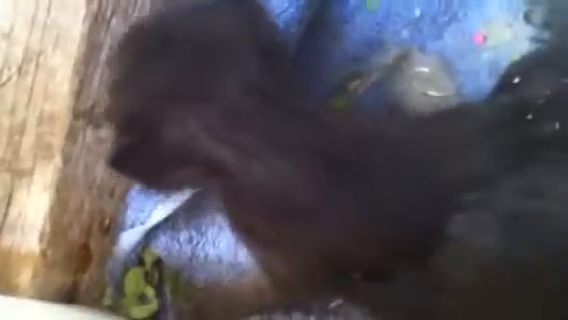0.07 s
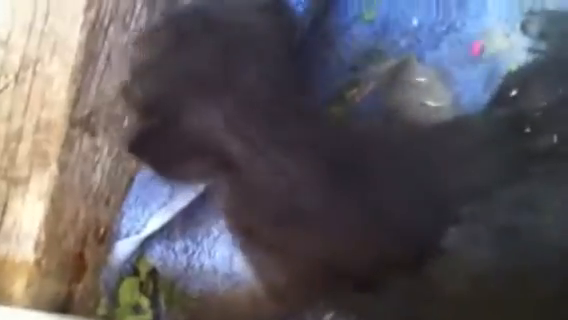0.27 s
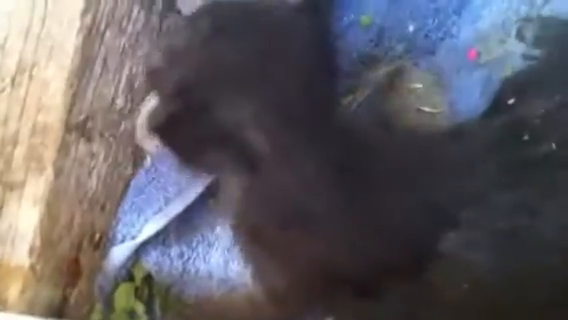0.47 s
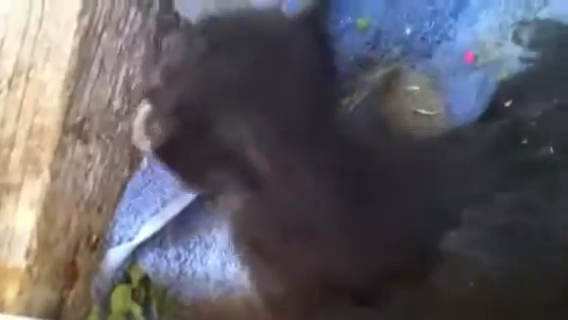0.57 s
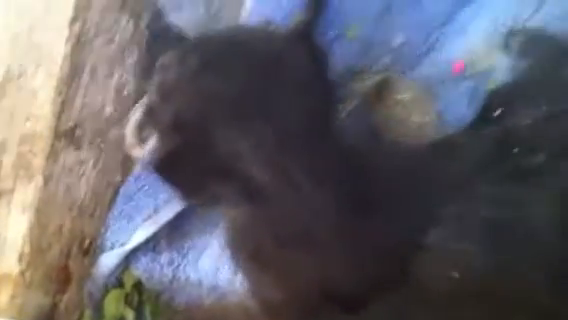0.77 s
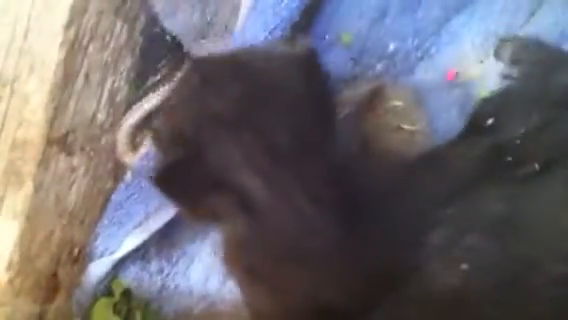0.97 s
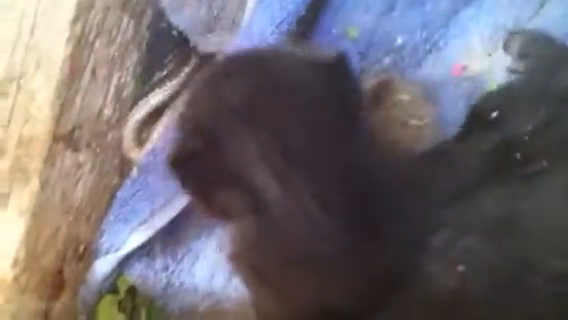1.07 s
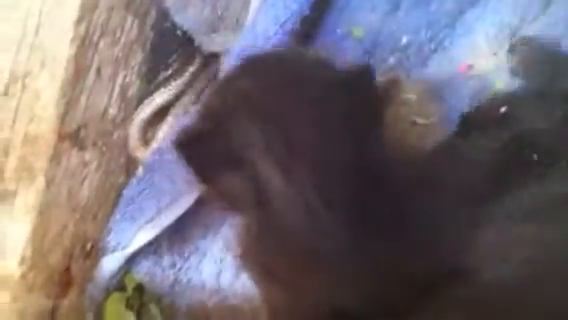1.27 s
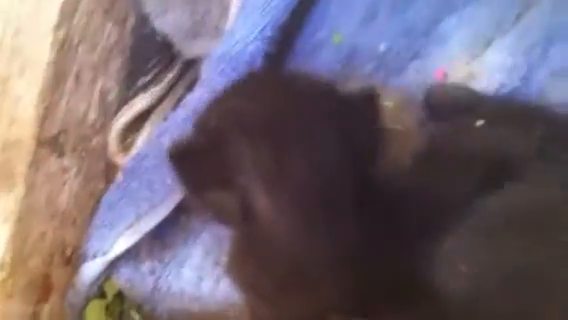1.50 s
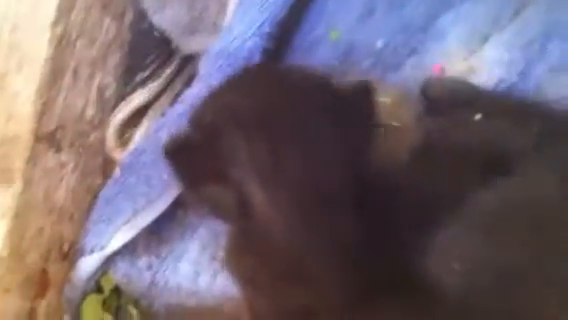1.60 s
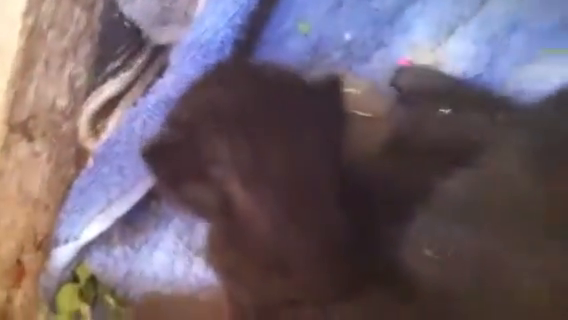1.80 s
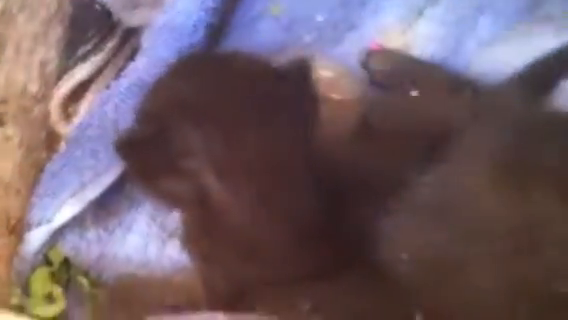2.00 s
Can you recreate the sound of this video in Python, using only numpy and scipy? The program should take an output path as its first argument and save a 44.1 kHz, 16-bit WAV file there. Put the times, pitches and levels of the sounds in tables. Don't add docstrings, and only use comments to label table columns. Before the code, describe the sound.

Two high, cracking kitten mews up close, over low air thumps, fur rustle and tiny ticks

```python
import sys
import numpy as np
from scipy import signal
from scipy.io import wavfile

SR = 44100
rng = np.random.default_rng(int(sys.argv[2]) if len(sys.argv) > 2 else 0)


def invert_db(level):
    return 10 ** (np.asarray(level, dtype=float) / 20)


def unload_audio(sound):
    columns = np.transpose(np.atleast_2d(sound))
    steps = np.round(np.clip(columns, -1, 1) * 32767)
    wavfile.write(sys.argv[1], SR, steps.astype(np.int16))


N = 90404
T = np.arange(N) / SR


def rms_one(x):
    return x / np.sqrt(np.mean(x ** 2) + 1e-20)


def drift(rate_hz):
    r = np.exp(-2 * np.pi * rate_hz / SR)
    settle = 20000
    wander = signal.lfilter([1], [1, -2 * r, r * r], rng.standard_normal(N + settle))
    return rms_one(wander[settle:])


def gate(start, length, edge):
    inside = np.minimum(T - start, start + length - T)
    return np.sin(np.pi / 2 * np.clip(inside / edge + .5, 0, 1)) ** 2


def band(x, low_hz, high_hz):
    return signal.sosfilt(signal.butter(2, [low_hz, high_hz], "band", fs=SR, output="sos"), x)


def coloured(spectrum):
    hz, db = np.transpose(spectrum)
    edges = 295 * 2 ** np.arange(0, 6, 1 / 3)
    white = rng.standard_normal((2, N))
    out = 0
    for k, (low, high) in enumerate(zip(edges, edges[1:])):
        level = np.interp(np.log(low * high) / 2, np.log(hz), db)
        out = out + invert_db(level + drift(20)) * band(white[k % 2], low, high)
    return rms_one(out)


# f/Hz, level/dB per Hz
AIR_SPECTRUM = [(320, -2), (1000, -1), (4300, -12), (5200, -23.5), (9000, -27), (12000, -26.5),
                (15600, -44)]


def still_air():
    return invert_db(-60) * coloured(AIR_SPECTRUM)


# t/s, level/dB
RUB_LEVEL = [(0, -55.5), (.17, -52.5), (0.201, -59.5), (.57, -64), (.6, -58.5), (.67, -63), (.71, -56),
             (0.796, -57.5), (0.829, -61.5), (1.3, -64.5), (1.35, -56), (1.47, -59), (1.563, -53),
             (1.621, -64), (1.691, -57), (1.838, -57), (1.87, -63.5), (2.05, -58)]
# f/Hz, level/dB per Hz
CLOTH_SPECTRUM = [(1800, 0.5), (2800, 0), (4300, -0.5), (5200, -8.5), (7200, -5.5), (10500, -18),
                  (15600, -53)]


def fur_rub():
    s, db = np.transpose(RUB_LEVEL)
    return invert_db(np.interp(T, s, db)) * coloured(CLOTH_SPECTRUM)


# t/s, length/s, level/dB, low f/Hz, high f/Hz
SCUFF_EVENTS = [
    (1.256, .016, -62, 2000, 9500),
    (.752, .04, -62, 5900, 7300),
    (.408, .025, -65, 6900, 7500),
    (.583, .03, -59, 800, 3000),
    (.69, .12, -71, 7000, 11000),
    (.2, .17, -61, 2300, 3200),
    (.38, .07, -61, 2400, 3200),
    (.46, .06, -62, 2300, 3400),
    (1.68, .18, -60, 2900, 4700),
    (2.03, .03, -60, 700, 3000),
]


def scuffs():
    out = 0
    white = rng.standard_normal(N)
    for s, length, db, low_hz, high_hz in SCUFF_EVENTS:
        patchy = invert_db(db + 2.5 * drift(45))
        out += patchy * rms_one(band(white, low_hz, high_hz)) * gate(s, length, length / 2)
    return out


# t/s, peak/dB, f/Hz
CLAW_TICKS = [(.009, -57, 8500), (.015, -58, 7600), (.023, -63, 8800), (.042, -53, 9000), (.073, -42, 9800),
              (.468, -56, 12500), (0.618, -50, 6900), (0.877, -59.5, 8900), (0.911, -46, 5500),
              (1.313, -46, 895), (1.653, -49, 8200), (1.745, -49.5, 8000), (1.746, -37, 1970),
              (1.93, -51, 5500), (1.95, -50, 9400), (2.043, -37, 1190)]


def claw_ticks():
    t60_s, rise_s, snap_db = .008, .0008, -4
    out = 0
    white = rng.standard_normal(N)
    for s, db, hz in CLAW_TICKS:
        snap = invert_db(snap_db) * rms_one(band(white, hz / 1.8, hz * 1.15))
        ring = np.sin(2 * np.pi * hz * (T - s)) + snap
        decay = invert_db(db - 60 * np.clip(T - s, 0, None) / t60_s)
        out += decay * np.clip((T - s) / rise_s, 0, 1) * ring
    return out


# t/s, level/dB
GUST_LEVEL = [(0, -62.5), (.11, -51), (0.301, -50), (0.359, -28.5), (0.444, -43.5), (.86, -44), (.88, -53),
              (1.021, -51), (1.08, -54.5), (1.28, -53), (1.32, -55), (1.69, -59), (1.718, -44.5),
              (2.05, -49)]


def gusts():
    s, db = np.transpose(GUST_LEVEL)
    lumpy = invert_db(np.interp(T, s, db) - 0.5 + 3.53 * drift(11))
    return lumpy * rms_one(band(rng.standard_normal(N), 100.3, 268.5))


# t/s, peak/dB, f/Hz
PORT_PUFFS = [(0.127, -32, 160), (0.317, -30.5, 186), (0.342, -14.5, 195), (0.356, -21, 350),
              (0.362, -26, 201), (0.376, -17, 190.4), (0.386, -16, 189.4), (0.395, -17.5, 190.5),
              (0.415, -21, 170), (0.446, -23, 150), (0.469, -26, 200), (0.502, -30, 138),
              (0.556, -27.5, 162), (0.61, -35, 215), (0.628, -22, 145), (0.677, -30, 180),
              (0.705, -28.5, 245), (0.72, -27, 198), (0.746, -28.5, 198), (0.793, -29.5, 158.4),
              (0.81, -27, 190), (0.829, -32, 148.6), (0.842, -26.5, 162), (0.995, -48, 171),
              (1.016, -36, 200), (1.038, -35.5, 138), (1.212, -37.5, 136), (1.247, -39.5, 150),
              (1.276, -45, 124), (1.711, -35.5, 170), (1.731, -24.5, 162), (1.753, -27.5, 186.5),
              (1.776, -32.5, 181), (1.792, -36.5, 176), (1.835, -35.5, 123), (1.853, -41, 149),
              (2.036, -32, 152), (1.914, -31.5, 141), (1.948, -31, 153), (1.973, -30.5, 152)]


def puffs():
    cycles, trim_db = 2.6, -2.5
    out = 0
    turns = rng.uniform(0, 2 * np.pi, (len(PORT_PUFFS), 1))
    for (s, db, hz), turn in zip(PORT_PUFFS, turns):
        shape = np.sin(np.pi * np.clip((T - s) * hz / cycles, 0, 1)) ** 2
        out += invert_db(db + trim_db) * shape * np.sin(2 * np.pi * hz * (T - s) + turn)
    return out


# t/s, length/s, level/dB, top f/Hz
PORT_EDDIES = [
    (0.338, 0.039, -32, 520),
    (0.36, 0.0247, -28.5, 1150),
    (0.384, 0.007, -29.5, 870),
    (0.401, 0.0025, -26.5, 1310),
    (0.626, 0.0086, -40.5, 470),
    (0.825, 0.005, -44.5, 472),
]


def eddies():
    out = 0
    white = rng.standard_normal(N)
    for s, length, db, top_hz in PORT_EDDIES:
        low_pass = signal.butter(3, top_hz, fs=SR, output="sos")
        eddy = signal.sosfilt(low_pass, band(white, 156.0, 796))
        out += invert_db(db) * rms_one(eddy) * gate(s, length, 0.01)
    return out


# t/s, length/s, start f/Hz, end f/Hz, level/dB
FAR_SQUEAKS = [
    (.205, .13, 2980, 2900, -62),
    (.512, .07, 2370, 2330, -63),
    (.585, .018, 2950, 2750, -62),
    (.612, .012, 2800, 2800, -63),
    (.758, .022, 5900, 6500, -64),
]


def far_squeaks():
    out = 0
    for s, length, start_hz, end_hz, db in FAR_SQUEAKS:
        hz = np.interp(T, [s, s + length], [start_hz, end_hz]) * (1 + 0.0086 * drift(92))
        tone = np.sin(2 * np.pi * np.cumsum(hz) / SR)
        out += invert_db(db + 5.3 * drift(90)) * tone * gate(s, length, 0.0092)
    return out


# t/s, length/s, f/Hz, level/dB, second partial/dB
CROAK_EVENTS = [
    (1.2462, 0.0075, 1170, -40.5, 3),
    (1.259, 0.007, 1450, -45, -8),
    (1.3008, 0.0025, 800, -45, -6),
    (1.304, 0.004, 720, -50, -21),
]


def croaks():
    sag, rasp_db = .14, -5
    out = 0
    for s, length, hz, db, second_db in CROAK_EVENTS:
        along = np.clip((T - s) / length, -.5, 1.5)
        phase = 2 * np.pi * np.cumsum(hz * (1 - sag * along + .03 * drift(400))) / SR
        tone = np.sin(phase) + invert_db(-24) * np.sin(3 * phase)
        tone += invert_db(second_db + drift(540)) * np.sin(2 * phase)
        rasp = band(rng.standard_normal(N), 0.65 * hz, 2.4 * hz)
        tone += invert_db(rasp_db) * rms_one(band(rasp, 0.65 * hz, 2.4 * hz))
        out += invert_db(db + drift(600)) * tone * gate(s, length, length)
    return out


def voice(track, overtones, rough):
    s, hz, db, mouth = np.transpose(track)
    hz, db, mouth = (np.interp(T, s, column) for column in (hz, db, mouth))
    hz = hz * (1 + rough * 0.0032 * drift(150))
    phase = 2 * np.pi * np.cumsum(hz) / SR
    out = np.sin(phase)
    for k, gain, follows in overtones(hz):
        shimmer_db = np.sqrt(k) * rough * 1.2 * drift(38)
        out += gain * invert_db(follows * mouth + shimmer_db) * np.sin(k * phase - k)
    return np.sqrt(2) * invert_db(db) * out * gate(s[0], s[-1] - s[0], 0.0042)


def peak(hz, centre_hz, width_hz, db, order=2):
    return invert_db(db) / (1 + (2 * (hz - centre_hz) / width_hz) ** order)


# f/Hz, width/Hz, level/dB over the fundamental
CHEST_RESONANCES = [(2470, 1400, 2.5), (3130, 500, 11), (4300, 650, 11.5), (5500, 600, 0), (7000, 800, 3),
                    (8500, 1500, -10), (9800, 1600, -14), (12300, 600, -17)]


def chest(hz):
    return [(k, sum(peak(k * hz, *p) for p in CHEST_RESONANCES), 1) for k in range(2, 13)]


# multiple, level/dB over the fundamental, share of mouth opening
HEAD_OVERTONES = [(2, -2, 1), (3, -29.5, 0.96), (4, -38.5, 0.067), (5, -31, 0.094), (6, -33.5, 0.96),
                  (7, -49, .1)]


def head(hz):
    out = []
    for k, db, follows in HEAD_OVERTONES:
        lift = 1 + peak(k * hz, 7800, 680, 20, order=6) + peak(k * hz, 8600, 200, 13)
        out.append((round(k), invert_db(db) * lift, follows))
    return out


# multiple, level/dB over the fundamental, share of mouth opening
SMALL_OVERTONES = [(2, -20, 1.0), (3, -40, 0.075), (4, -40, -0.75), (7, -41, -0.26)]


def small(hz):
    out = []
    for k, db, follows in SMALL_OVERTONES:
        out.append((round(k), invert_db(db) * (1 + peak(k * hz, 6000, 230, 14)), follows))
    return out


# t/s, f/Hz, level/dB, mouth opening/dB
MEW1_RISE = [(.002, 1104, -51, -17), (.014, 1007, -61.5, -2.5), (.048, 1114, -57.5, -3),
             (.075, 1186, -54, -9), (.09, 1273, -56.5, 1.5), (.114, 1450, -54.5, -3.5),
             (.13, 1598, -55.5, 1.5), (.152, 1682, -65, -0.5), (.178, 1810, -57, -5)]
MEW1_HOLD = [(.181, 1990, -44.5, 7), (.24, 1990, -44, 4), (.308, 1943, -42.5, -3), (.362, 1905, -43, -9),
             (.408, 1862, -43.5, -10), (.46, 1784, -45.5, -20), (.54, 1740, -50.5, -50),
             (.66, 1665, -60, -10), (.765, 1572, -68.5, -29)]
MEW1_DROP = [(.796, 1330, -62, -4), (.804, 1100, -55, -6), (.81, 982, -53, -9), (.828, 836, -54, -9),
             (.835, 781, -62, -6)]
MEW2_LOW = [(.869, 1398, -49.5, 16), (.876, 1553, -49, -2), (.889, 1410, -48, 7), (.918, 1558, -49.5, 4.5),
            (.955, 1504, -48, 6.5), (.978, 1509, -41.5, 0), (1.04, 1484, -42, -3), (1.063, 1426, -43, -18)]
MEW2_HIGH = [(1.064, 1680, -48, -1.5), (1.072, 1690, -48, -1.5), (1.074, 1480, -48, 3),
             (1.078, 1500, -47, 3), (1.08, 1700, -47, -8), (1.101, 1678, -47.5, 3), (1.139, 1645, -52, 9),
             (1.193, 1594, -55, 10), (1.246, 1485, -52.5, 6)]


def near_mews():
    first = voice(MEW1_RISE, chest, rough=1.0) + voice(MEW1_HOLD, head, rough=0.28)
    first += voice(MEW1_DROP, small, rough=1.0)
    second = voice(MEW2_LOW, small, rough=0.59) + voice(MEW2_HIGH, small, rough=0.33)
    return first + second


def scene():
    blanket = still_air() + fur_rub() + scuffs() + claw_ticks()
    wind = gusts() + puffs() + eddies()
    kittens = far_squeaks() + croaks() + near_mews()
    return (blanket + wind + kittens)[None]


def top_cut(x):
    return signal.sosfilt(signal.butter(12, 15740, fs=SR, output="sos"), x)


def record(dry):
    mix = signal.sosfilt(signal.butter(1, 90, "high", fs=SR, output="sos"), dry)
    return top_cut(mix)


dry = scene()
out = record(dry)
unload_audio(out)
```